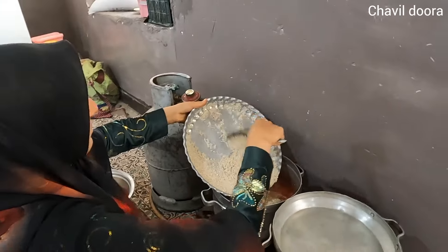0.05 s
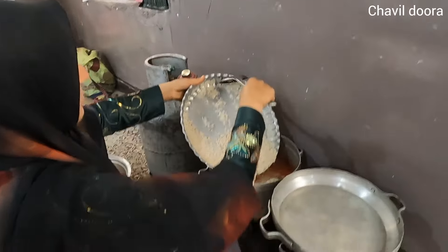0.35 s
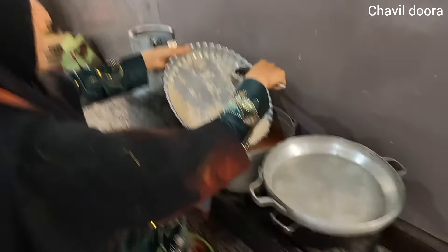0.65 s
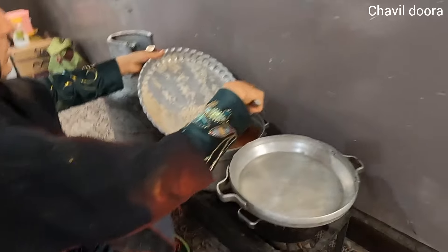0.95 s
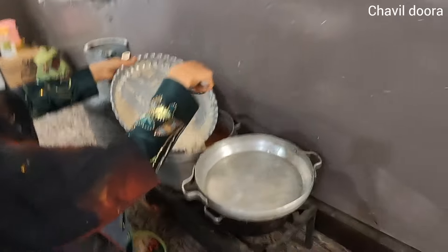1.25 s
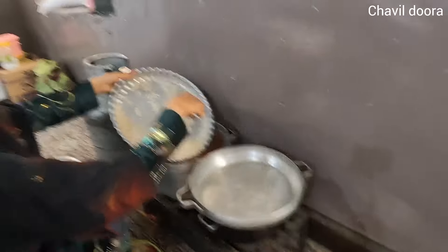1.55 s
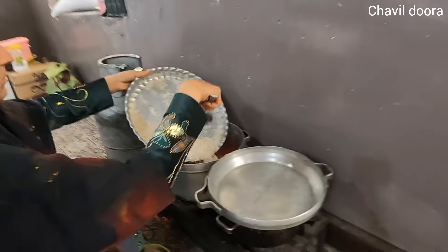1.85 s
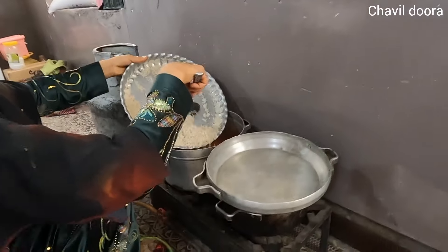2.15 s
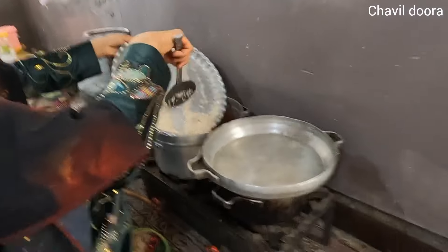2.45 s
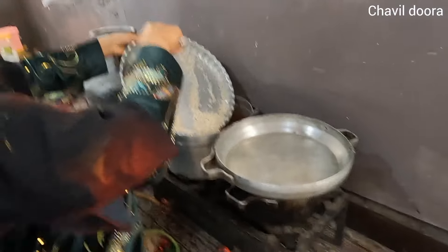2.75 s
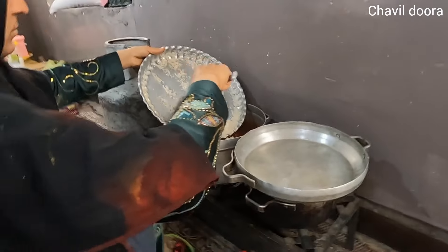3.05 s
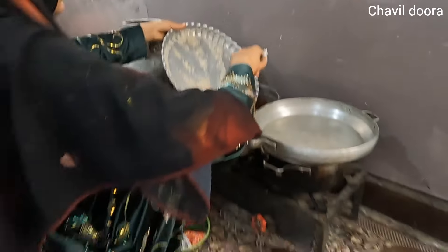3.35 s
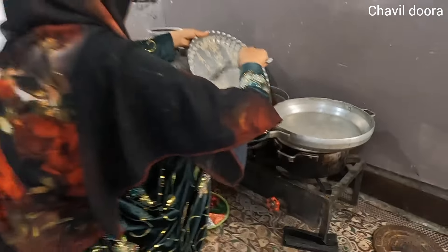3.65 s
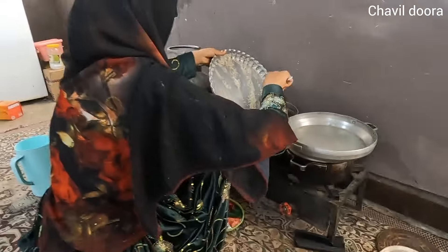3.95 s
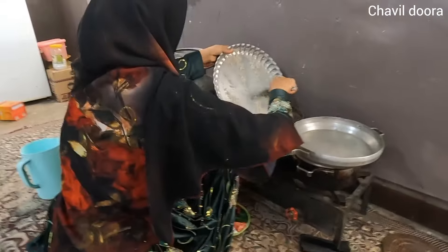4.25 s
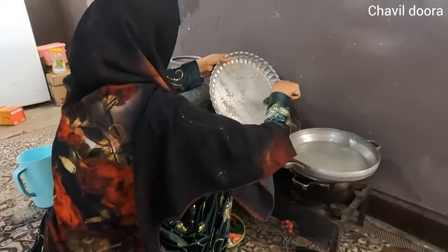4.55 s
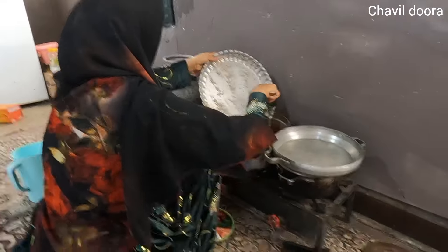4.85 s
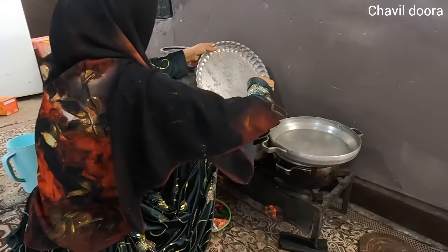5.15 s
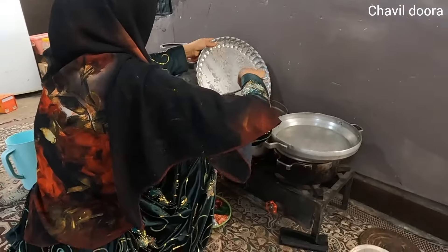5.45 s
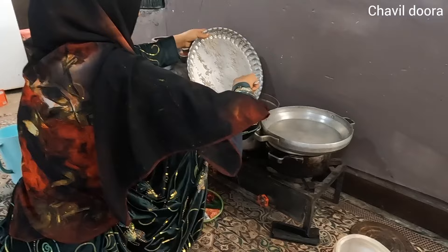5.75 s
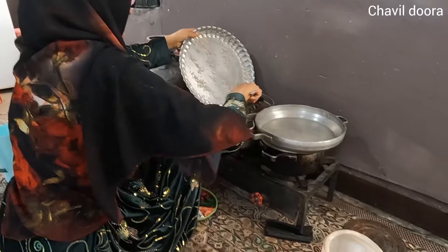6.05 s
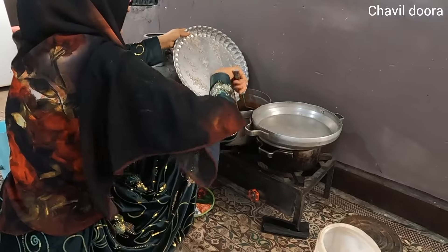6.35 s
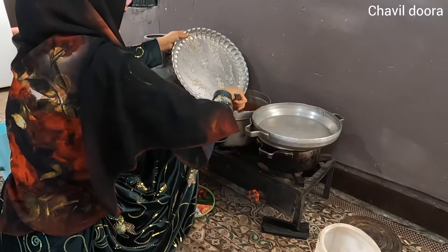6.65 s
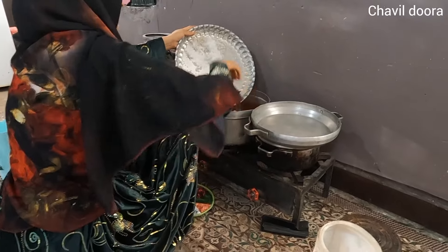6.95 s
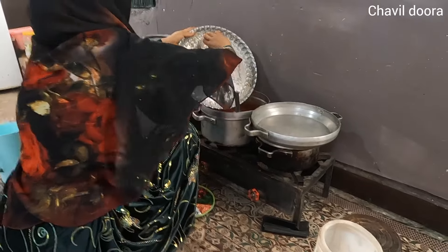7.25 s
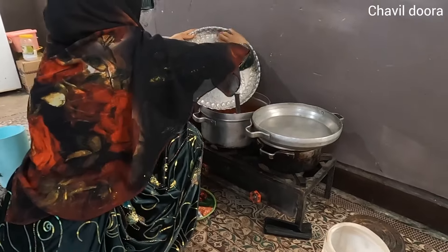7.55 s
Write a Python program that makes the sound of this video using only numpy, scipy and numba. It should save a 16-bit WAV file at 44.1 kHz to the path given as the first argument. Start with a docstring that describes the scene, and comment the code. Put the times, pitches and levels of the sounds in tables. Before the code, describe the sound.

A metal spoon pushes cooked rice off an aluminium tray. Each stroke lands with a clack and a short, damped ring, then rasps and chatters across the metal. Quick swishing sweeps mix with slower grinding pushes, and a few clumps plop softly into a pot. The strokes grow light near the end. A gas burner hisses faintly over a low rumble, heard from about a metre away in a small kitchen.

```python
"""A metal spoon pushes cooked rice off a hand-held aluminium tray into a pot, in a small hard-walled kitchen.
Each stroke lands with a clack, then chatters and scrapes as the edge sticks and slips on the metal sheet,
which rice and hand keep damped. Clumps of rice plop softly into the pot. A gas burner hisses faintly
beside it, over a low rumble. A phone listens from about a metre away."""
import sys
import numpy as np
from scipy import signal
from scipy.fft import rfft, irfft
from scipy.io import wavfile
from scipy.ndimage import uniform_filter1d
from numba import njit

SR = 44100
rng = np.random.default_rng(int(sys.argv[2]) if len(sys.argv) > 2 else 0)


def wrap_up_sound(samples):
    """Save the sound to the file named by the first command line argument, as 16-bit audio."""
    columns = np.atleast_2d(samples).T
    # keep every value between -1 and 1, then stretch to whole-number steps
    tamed = np.clip(columns, -1, 1)
    steps = np.round(tamed * 32767).astype(np.int16)
    wavfile.write(sys.argv[1], SR, steps)


N = 335160
TIME = np.arange(N) / SR


def undb(db):
    """Turn decibels into a gain to multiply by."""
    return 10 ** (np.asarray(db) / 20)


def unit(x):
    """Scale a sound to an average (rms) level of 1."""
    return x / np.sqrt(np.mean(x ** 2))


def unit_peak(x):
    """Scale a sound so its loudest 4 ms have a level of 1."""
    return x / np.sqrt(uniform_filter1d(x ** 2, size=176).max())


def fade(t, t60):
    """Die away by 60 dB in t60 seconds, the ring time."""
    return np.exp(-np.log(1000) * t / t60)


def wander(rate):
    """A smooth random drift of about size 1, turning up to `rate` times a second."""
    hold = max(int(SR / rate), 2)
    steps = np.repeat(rng.standard_normal(N)[:N // hold + 1], hold)
    return unit(uniform_filter1d(steps, hold)[:N])


def tiny_hits(rate, spread_db):
    """About `rate` random clicks a second, many small and a few large."""
    happens = rng.random(N) < rate / SR
    return happens * rng.choice([-1, 1], N) * undb(spread_db * np.minimum(rng.exponential(size=N), 4))


def through(x, response):
    """Let every sample of x set off the response (convolution)."""
    return signal.fftconvolve(x, response)[:len(x)]


def band(x, lo_hz, hi_hz, order=2):
    """Keep the sound between two frequencies."""
    edges = [lo_hz, min(hi_hz, SR / 2 - 1)]
    return signal.sosfilt(signal.butter(order, edges, "band", fs=SR, output="sos"), x)


def over_hz(table, hz):
    """Read a table's columns at any frequency, blending between rows."""
    points, *columns = np.transpose(table)
    return [np.interp(np.log(hz + 1), np.log(points), column) for column in columns]


def colour(x, spectrum, size=2048):
    """Shape the tone with a curve of (Hz, dB) points."""
    db, = over_hz(spectrum, np.fft.rfftfreq(size, 1 / SR))
    cepstrum = irfft(np.log(undb(db)))
    cepstrum[1:size // 2] *= 2  # folded so the filter never rings ahead of the sound
    cepstrum[size // 2 + 1:] = 0
    return through(x, irfft(np.exp(rfft(cepstrum))))


@njit
def resonance(x, hz, width):
    """Keep a band around a moving pitch; width is a share of that pitch."""
    out, band_state, low_state = np.empty(len(x)), 0., 0.
    for i in range(len(x)):
        tuning = np.tan(np.pi * hz[i] / SR)
        swing = (band_state + tuning * (x[i] - low_state)) / (1 + tuning * (tuning + width))
        band_state = 2 * swing - band_state
        low_state += 2 * tuning * swing
        out[i] = width * swing
    return out


# How the rumble rises and falls. Each row: time in seconds, relative level in dB.
RUMBLE_LEVELS = [(0.0, -56), (0.44, -62), (0.51, -42), (0.95, -55), (1.63, -42), (1.78, -49), (1.88, -39),
                 (2.52, -53.5), (2.73, -37), (3.11, -46.5), (3.81, -41), (3.89, -47), (7.11, -58),
                 (7.15, -42), (7.41, -57.5), (7.6, -45.5)]

def rumble(gain_db=4.5):
    """A low, uneven rumble swells and sinks, nearly alike left and right."""
    db = np.interp(TIME, *np.transpose(RUMBLE_LEVELS))
    tone = [(8, -1.0), (22, -0.5), (40, -6.5), (70, -12), (110, -18.5), (150, -13.5),
            (220, -47), (900, -66)]
    common, left, right = (unit(colour(rng.standard_normal(N), tone, size=8192)) for _ in range(3))
    return (common + 0.43 * np.array([left, right])) * undb(db + gain_db)


# The tone of the gas flame. Each row: frequency in Hz, relative level in dB.
FLAME_TONE = [(90, -3), (170, 13.5), (310, 1.5), (490, 5), (650, -7.5), (1000, 0), (2000, -7),
              (4800, -11.5), (6500, -4.5), (8000, -26), (9500, -17), (10700, -35), (11900, -28),
              (15000, -46)]

def burner(level_db=-54):
    """The flame hisses almost evenly, spread a little by the walls."""
    common, left, right = (unit(colour(rng.standard_normal(N), FLAME_TONE)) for _ in range(3))
    return (common + 0.56 * np.array([left, right])) * undb(level_db + wander(15))


# Rice dropping into the pot. Each row: start in seconds, relative level in dB.
RICE_DROPS = [(1.31, -47.5), (1.39, -47.5), (1.86, -41), (1.95, -44), (2.02, -44), (2.71, -47), (3.64, -44),
              (7.53, -46.5)]

def plops(gain_db=-3, patter_db=-15, bump_hz=170, rise_s=0.025):
    """Soft clumps land with a dull bump and a little patter of single grains."""
    level = np.zeros(N)
    for start, db in RICE_DROPS:
        age = np.maximum(TIME - start, 0) / rise_s
        level += undb(db + gain_db) * age * np.exp(1 - age)
    grains = tiny_hits(rate=1500, spread_db=3.5)
    bump = unit(band(grains, 0.74 * bump_hz, 1.24 * bump_hz))
    patter = unit(band(grains, 300, 4500, order=1))
    return level * (bump + undb(patter_db) * patter)


# The spoon's own notes. Each row: pitch in Hz, ring time in seconds, relative level in dB.
SPOON_NOTES = [(4170, 0.077, 2), (4300, 0.045, -1.5), (5550, 0.04, 2), (6150, 0.075, 2.5), (6690, .08, 3.5),
               (9400, 0.078, -13), (11900, .06, -19)]
# Light touches of the spoon. Each row: start in seconds, level in dB.
LIGHT_TOUCHES = [(2.532, -39), (2.569, -34), (6.250, -42), (6.266, -46), (6.327, -47.5)]

def clinks():
    """The spoon barely touches and rings freely, a little differently each time."""
    out = np.zeros(N)
    hz, t60, db = np.transpose(SPOON_NOTES)[:, :, None]
    t = np.arange(SR // 2) / SR
    onset = 1 - fade(t, 0.0022)
    for start, level_db in LIGHT_TOUCHES:
        detune, weight = rng.standard_normal((2,) + hz.shape)
        notes = undb(db + 2 * weight) * fade(t, t60) * np.sin(2 * np.pi * hz * (1 + 0.0034 * detune) * t)
        out[int(start * SR):][:len(t)] += undb(level_db) * notes.sum(axis=0) * onset
    return out


# The tray's booms and clanks. Each row: start in seconds, pitch in Hz, level in dB, ring time in seconds.
BOOM_NOTES = [(1.605, 280, -25.5, 0.15), (2.096, 212, -23, 0.085), (2.095, 486.5, -23, 0.23),
              (3.735, 205.8, -22.5, 0.36), (3.736, 228.4, -13.5, 0.18), (4.229, 184, -27, 0.21),
              (4.227, 410, -30, 0.27), (4.227, 513, -27, 0.45), (4.838, 890, -23.5, 0.19),
              (6.573, 1370, -21.5, 0.074), (6.670, 193, -29.5, 0.32), (6.669, 1054, -24, 0.1)]

def booms():
    """A hard landing bends the whole sheet, which swings back with a few strong notes."""
    out = np.zeros(N)
    for start, hz, db, t60 in BOOM_NOTES:
        t = np.maximum(TIME - start, 0)
        out += undb(db) * fade(t, t60) * np.sin(2 * np.pi * hz * t)
    return out


# The loaded tray's notes. Each row: pitch in Hz, ring time in seconds, dB above the plain sheet.
TRAY_NOTES = [(143.9, 0.23, 2.5), (220, 0.22, 2.5), (305, 0.12, -1), (452, 0.12, 0), (512, 0.17, 6),
              (578.7, 0.1, 3.5), (798, 0.35, 4), (935, 0.12, 0), (1110, 0.086, -2), (1352, 0.089, -1.5),
              (1460, 0.18, -0.5), (1770, 0.18, -5), (2380, 0.12, -1), (2828, 0.12, 3), (3290, 0.15, 1.5),
              (3670, 0.11, 5.5), (3850, 0.022, -1), (4050, 0.02, 6), (4885, 0.019, 2.5), (5200, 0.065, -25),
              (6494, 0.024, 0)]

def tray_ring(spread_db=3, size=12000):
    """The sheet's ring after a tap on one spot; each spot mixes the notes differently."""
    t = np.arange(size) / SR
    hz, t60, db = np.transpose(TRAY_NOTES)[:, :, None]
    weight = undb(db + spread_db * rng.standard_normal(hz.shape))
    notes = fade(t, t60) * np.cos(2 * np.pi * (hz * t + rng.random(hz.shape)))
    damping = 2 * np.log(1000) / (t60 * SR)  # keeps long notes from building up louder
    return np.sum(weight * damping * notes, axis=0)


def contact(start, lift, attack_s=0.0086):
    """A stroke's loudness: the spoon brushes into the rice, bites and lifts; loose grains slide on."""
    before, after = np.maximum(start - TIME, 0), np.maximum(TIME - lift, 0)
    brush = undb(-20) * fade(before, t60=0.23)
    bite = np.clip((TIME - start) / attack_s, 0, 1)
    trickle = undb(-20.5) * fade(after, t60=1)
    return np.maximum(bite, brush) * np.maximum(fade(after, t60=0.15), trickle)


def sweep(start, fastest, lift, swell_s, shove_db, drag_db, swish_db, first_hz, last_hz):
    """A quick sweep sheds its rice while a swish on bare metal swells with the spoon's speed."""
    shed_db_per_s, glide_s = 116, 0.1203
    t = np.clip(TIME, start, lift)
    shove = undb(shove_db - shed_db_per_s * (t - start))
    swish = undb(swish_db) * np.exp(-((t - fastest) / swell_s) ** 2)
    grind = np.hypot(undb(drag_db), undb(-8) * swish)
    rasp = np.hypot(undb(drag_db), swish)
    pitch = np.interp(TIME, [lift - glide_s, lift], [first_hz, last_hz])
    return np.array([shove, grind, rasp]) * contact(start, lift), pitch


def push(start, lift, shove_db, grind_db, rasp_db, ease_db_per_s, first_hz, last_hz):
    """A slow push stays in the rice; one pressure, usually easing, drives shove, grind and rasp."""
    pressure = contact(start, lift) * undb(-ease_db_per_s * (np.clip(TIME, start, lift) - start))
    pitch = np.interp(TIME, [start, lift], [first_hz, last_hz])
    return undb([[shove_db], [grind_db], [rasp_db]]) * pressure, pitch


# Quick sweeps. Each row: start, fastest moment, lift and swell length in seconds,
# relative levels of shoved rice, drag and swish in dB, first and last pitch in Hz.
QUICK_SWEEPS = [(0.0, 0.143, 0.19, 0.07, -28.5, -38, -18.5, 2070, 1200),
                (1.601, 1.75, 1.82, 0.08, -29, -50, -27.5, 1138, 1490),
                (2.09, 2.309, 2.373, 0.12, -24.5, -37, -19.5, 1596, 1988),
                (3.728, 3.892, 3.935, 0.04, -32.5, -33, -26.5, 1130, 1753),
                (4.227, 4.435, 4.46, 0.052, -21.5, -34, -23, 1202, 1727)]
# Slow pushes. Each row: start and lift in seconds, relative levels of shoved rice, grinding and
# metal rasp in dB, easing off in dB per second, first and last pitch in Hz.
SLOW_PUSHES = [(0.348, 0.42, -60, -51, -54, 40, 1200, 1206), (0.487, 0.86, -32, -31, -41, 0, 1194, 1207),
               (0.886, 1.072, -37, -35, -35.5, -2, 1206, 1428),
               (2.53, 2.584, -54, -49, -41.5, 2, 1410, 1405),
               (2.768, 2.829, -35.5, -40, -50, 26, 1095, 1095),
               (2.919, 3.157, -38, -37.5, -35, 18, 1083, 1457),
               (3.172, 3.371, -36, -30.5, -33.5, 2, 1502, 1189),
               (4.838, 4.966, -33, -29, -31, 70, 1283, 1254),
               (4.978, 5.25, -34.5, -25.5, -32, 44, 1153, 893),
               (5.289, 5.38, -34.5, -33, -39.5, 67, 800, 900), (5.422, 5.549, -49, -41, -42, 10, 906, 900),
               (5.653, 5.783, -35, -26, -33.5, 5, 1640, 1550),
               (5.811, 5.912, -41.5, -23, -35.5, -13, 1200, 800),
               (5.97, 6.042, -42, -25.5, -31, 21, 800, 994),
               (6.206, 6.265, -51.5, -48, -54, -3, 1010, 1000),
               (6.569, 6.796, -37, -29, -39, 75, 1337, 900), (6.931, 7.006, -49.5, -52, -74, 7, 947, 954),
               (7.159, 7.292, -51.5, -49.5, -61, 0, 990, 978)]

def strokes(rest_db=-75):
    """All strokes in turn give the shove, grind and rasp levels in dB; the latest sets the pitch."""
    gains, pitch = np.full((3, N), undb(rest_db)), np.zeros(N)
    moves = [(row, sweep) for row in QUICK_SWEEPS] + [(row, push) for row in SLOW_PUSHES]
    for row, move in sorted(moves, key=lambda entry: entry[0][0]):
        gain, hz = move(*row)
        gains = np.maximum(gains, gain)
        pitch = np.where((TIME >= row[0]) | (pitch == 0), hz, pitch)
    return *(20 * np.log10(gains)), pitch


# The spoon skipping. Each row: first catch, last catch and spacing in seconds, boost in dB.
EDGE_SKIPS = [(1, 1.046, 0.049, 5.5), (3.061, 3.313, 0.035, 5.5), (4.954, 5.128, 0.0342, 7)]

def catches(half_length_s=0.0072):
    """The scrape gets briefly louder each time the skipping edge catches, at an even pace."""
    db = np.zeros(N)
    for first, last, spacing, boost_db in EDGE_SKIPS:
        nearest = np.clip(np.round((TIME - first) / spacing), 0, np.round((last - first) / spacing))
        offset_s = TIME - first - nearest * spacing
        db += boost_db * np.exp(-np.minimum((offset_s / half_length_s) ** 2, 20))
    return undb(db)


# The tone of metal rubbing on metal. Each row: frequency in Hz, relative level in dB.
RASP_TONE = [(1000, -20.5), (1700, -15.5), (2230, -8), (2360, -5), (3160, -4.5), (3490, -2.5), (3760, -5.5),
             (4890, -3.5), (5870, -3.5), (6550, 2), (8220, -20), (9510, -11), (10800, -30.5), (12100, -24),
             (15000, -39)]
# The sheet's squeals. Each row: multiple of the scrape pitch, dB above the plain rubbing.
SHEET_SQUEALS = [(0.718, 7.5), (1.0, 11.5), (1.37, 7), (1.852, 7.5), (2.45, 2.5), (3.3, 4)]

def scraping(rings, judder_db=2.5, grain_db=16, squeal_width=0.013, pitch_drift=0.042):
    """The spoon edge sticks and slips: dull and juddering over rice, a bright swish on bare metal."""
    shove_db, grind_db, rasp_db, pitch = strokes()
    on_rice = np.clip((grind_db - rasp_db + 10) / 10, .15, 1)
    judder = undb(judder_db * on_rice * wander(170))
    glides = [(multiple * pitch * np.exp(pitch_drift * wander(22)), undb(db))
              for multiple, db in SHEET_SQUEALS]
    nearness = np.array([wander(16) for _ in rings])
    nearness /= np.sqrt(np.sum(nearness ** 2, axis=0))

    def squeal(x):
        """The spoon pins the sheet, so the notes between it and the rim glide as it travels."""
        return x + sum(gain * resonance(x, hz, squeal_width) for hz, gain in glides)

    def sheet(x):
        """The spoon passes from spot to spot, each with its own ring."""
        return x + sum(through(near * x, ring) for near, ring in zip(nearness, rings))

    coarse = sheet(tiny_hits(rate=2200, spread_db=2.5) * judder)
    # single grains snap from under the edge
    crackle = undb(grain_db) * on_rice * tiny_hits(rate=140, spread_db=3.5)
    fine = sheet(tiny_hits(rate=18000, spread_db=3.5) * judder + crackle)
    shove_tone = [(70, -26.5), (110, -9.5), (140, 3.0), (200, 2), (300, -2.5), (480, -6),
                  (650, -6.5), (1200, -51)]
    shove = unit(colour(coarse, shove_tone)) * undb(shove_db - 1)
    grind = unit(band(resonance(squeal(coarse), pitch, 1.53), 630, 2700)) * undb(grind_db - 3)
    rasp = unit(colour(squeal(fine), RASP_TONE)) * undb(rasp_db - 1)
    return shove + catches() * (grind + rasp)


# The tone of a metal tick. Each row: frequency in Hz, relative level in dB.
TICK_TONE = [(1400, -24.5), (2400, 8), (3500, 4.5), (5500, 5), (6700, 8), (7500, -6.5), (8200, -14.5),
             (9400, -6), (10600, -27.5), (11800, -16.5), (13200, -35), (15000, -31)]
# The spoon hitting the tray. Each row: start in seconds, relative level in dB,
# extra dB for the thud, extra dB for the clack, thud pitch in Hz.
SPOON_BLOWS = [(0.0024, -22.5, -1.5, -4.5, 166), (0.021, -27.5, 2, 7, 260), (0.4783, -12, -12, -13, 144),
               (0.522, -19.5, -0.5, 7.5, 171), (0.6456, -23, -19, 7.5, 170), (0.6619, -16, -7, 3.5, 175),
               (0.73, -20, -21, -6, 226), (0.7502, -18, -7, 6, 200), (0.7856, -22, -12, 6.5, 452),
               (0.8251, -30.5, 0, 12.5, 463), (0.847, -21.5, -2.5, -8, 475), (0.8614, -30.5, 8, 5, 480),
               (0.8889, -20, -15, -8.5, 275), (1.6012, -19.5, 3, -1, 286), (1.6648, -16, -4, -1, 265),
               (2.0948, -15, 3.5, 0, 250), (2.1043, -25, 6, 4, 231), (2.6837, -41, 2.5, -9, 132),
               (2.7656, -19, -5, -7.5, 390), (2.7775, -19, -17, -4.5, 151), (2.7958, -19.5, -9, -5.5, 153),
               (2.8139, -24, -3.5, -1, 172), (2.8659, -21.5, -14, -10, 161), (3.1706, -20, -12, -13, 147),
               (3.3086, -20.5, -16, -3, 293), (3.7349, -13.5, -12, 1, 212), (3.7955, -25, 3, 1, 203),
               (3.9407, -17, -5.5, -6, 497), (4.226, -13.5, -4, -3, 202), (4.8245, -13, -9.5, -6.5, 186),
               (4.836, -13, -9.5, -3.5, 144), (4.9865, -17.5, -7.5, -5, 173),
               (5.2889, -23.5, -7, -0.5, 180), (5.3538, -30.5, -10, -2, 183),
               (5.4148, -23.5, -8, -2.5, 280), (5.463, -33, -18, -2, 175), (5.6498, -14.5, -20, -8, 320),
               (5.7062, -16.5, -24, -10, 264), (5.719, -14, -20, -3, 175), (5.8909, -20, -21, 3, 175),
               (5.9683, -18, -11.5, 0.5, 247), (6.2494, -36.5, -13, -4.5, 207),
               (6.5719, -17.5, -9, -6, 412), (6.6377, -28, -8, -10, 417), (6.6698, -37.5, 15, 14, 178),
               (6.7212, -26.5, -15, -5.5, 167), (6.8045, -39.5, 10, 0, 267), (7.1317, -47, 4, -12, 156),
               (7.236, -35, 3, -7, 132)]

def blows(rings, chatter=0.35, buzz=0.02, size=14000, lead_samples=150):
    """Each blow is a light touch through the rice, a hard hit, brief chatter and a weak buzz of the sheet."""
    out = np.zeros(N + 2 * size)
    t = (np.arange(size) - lead_samples) / SR
    after = np.maximum(t, 0)
    hit = t == 0
    rattle = chatter * fade(after, t60=0.022) + buzz * fade(after, t60=0.37)
    grit_level = np.where(t < 0, chatter * undb(-24), rattle)
    for k, (start_s, db, thud_db, clack_db, thud_hz) in enumerate(SPOON_BLOWS):
        tray = rings[k % len(rings)].copy()
        tray[0] += 1  # the hit is heard at once, then rings
        grit = rng.standard_normal(size) * grit_level
        tick = undb(-2) * unit_peak(colour(through(hit + grit, tray), TICK_TONE))
        flex = through(hit + 0.37 * grit, tray)  # heavy bending follows the hit more than the chatter
        clack = undb(clack_db - 1) * unit_peak(band(flex, 603, 1580))
        thud = undb(thud_db - 1) * unit_peak(band(flex, 0.59 * thud_hz, 1.72 * thud_hz))
        start = int(start_s * SR)
        out[start:start + size] += undb(db) * (tick + clack + thud)
    return out[lead_samples:lead_samples + N]


def kitchen(x, wall_s=0.0023, wall_gain=0.16, room_db=-10, t60=0.39, treble_t60=0.23, width=0.53):
    """The wall behind the tray slaps back, then a short echo follows, its bass alike left and right."""
    t = np.arange(26000) / SR
    mid, side = rng.standard_normal((2, len(t)))
    onset = np.clip(t / 0.0063 - 1, 0, 1)
    echoes = []
    for sign in (1, -1):
        noise = mid + sign * width * band(side, 600, SR / 2, order=1)
        low = band(noise, 89, 2000, order=1)
        tail = (low * fade(t, t60) + (noise - low) * fade(t, treble_t60)) * onset
        echoes.append(through(x, undb(room_db) * tail / np.sqrt(np.sum(tail ** 2))))
    slap = np.interp(TIME - wall_s, TIME, band(x, 1400, 14000, order=1))
    return x + wall_gain * slap + np.array(echoes)


def scene(spot_count=6):
    """Spoon, tray and falling rice sound in the kitchen, over the burner and the rumble."""
    rings = [tray_ring() for _ in range(spot_count)]
    serving = blows(rings) + booms() + clinks() + scraping(rings) + plops()
    return kitchen(serving) + burner() + rumble()


# How the phone's two microphone openings differ. Each row: frequency in Hz, left's lag in radians,
# left minus right in dB, share of the sound they do not have in common from 0 to 1.
MIC_OPENINGS = [(50, -0.5, -1, 0.01), (300, 0.34, .4, 0.01), (800, 0.36, 0, 0.11), (2520, 0.7, -0.3, 0.16),
                (4800, 0.33, -0.5, 0.16), (6650, 0, -0.5, 0.11), (8020, 0.76, 16, 0.2),
                (9390, 2.2, 10, 0.7), (10800, 7, 7, 0.6), (12000, 6.5, -2, 0.3), (13800, 11.5, 7.5, .7)]

def record(dry, gain_db=-2.0, top_hz=15100):
    """The openings differ in timing and treble; short waves arrive with a drifting phase; the top is cut."""
    lag, balance_db, share = over_hz(MIC_OPENINGS, np.fft.rfftfreq(N, 1 / SR))
    scattered = np.real(signal.hilbert(dry[1]) * np.exp(1j * np.pi * wander(40)))
    tilt = undb(balance_db / 2) * np.exp(-1j * lag / 2)  # each side gets half the difference
    left = rfft(dry[0]) * tilt
    right = (np.sqrt(1 - share) * rfft(dry[1]) + np.sqrt(share) * rfft(scattered)) / tilt
    lowpass = signal.ellip(8, .2, 70, top_hz, fs=SR, output="sos")
    return signal.sosfilt(lowpass, undb(gain_db) * irfft(np.array([left, right]), N))


dry = scene()
out = record(dry)
wrap_up_sound(out)
```